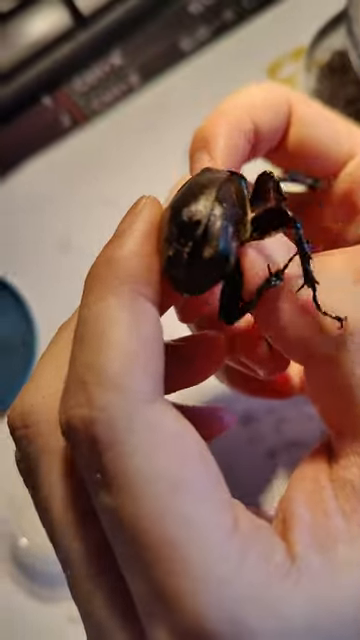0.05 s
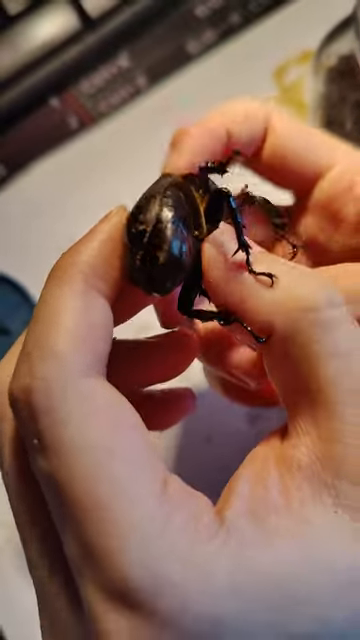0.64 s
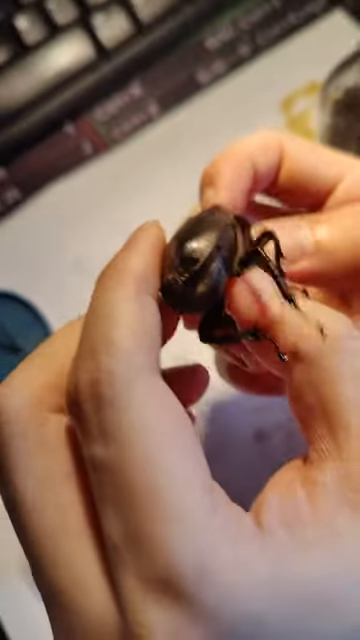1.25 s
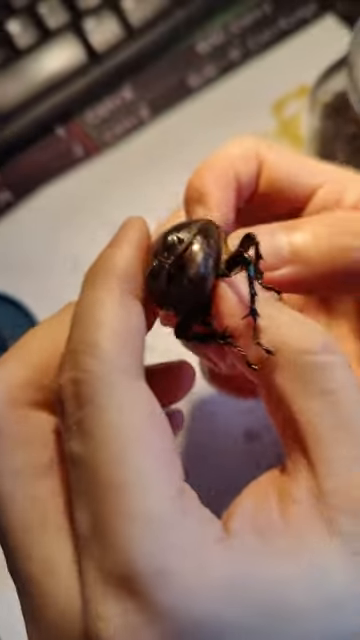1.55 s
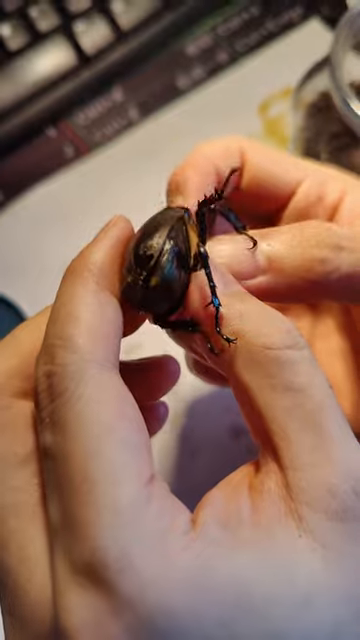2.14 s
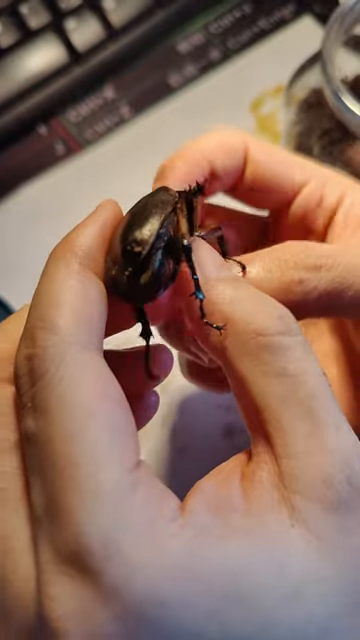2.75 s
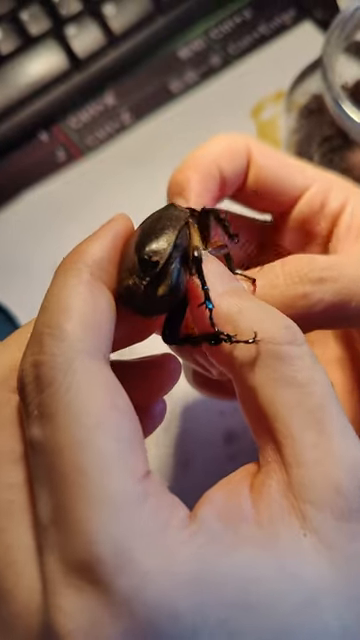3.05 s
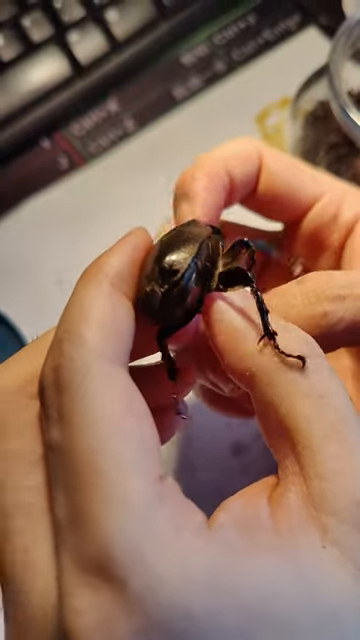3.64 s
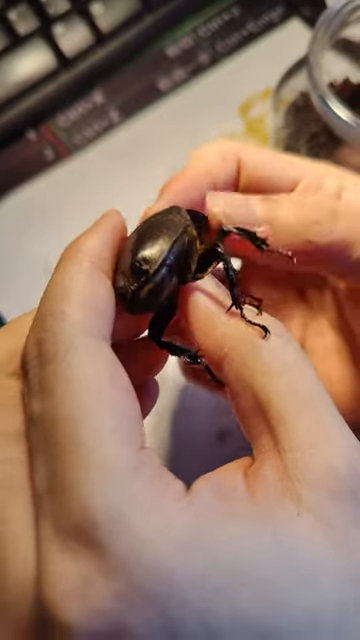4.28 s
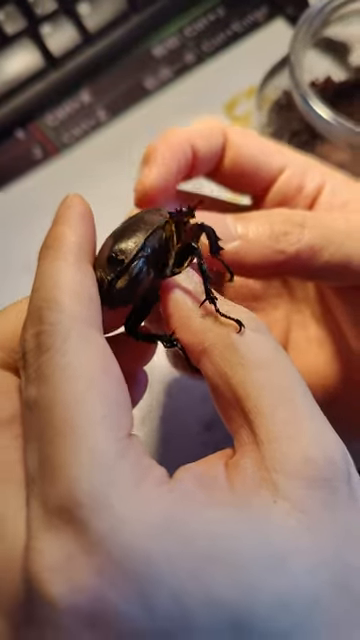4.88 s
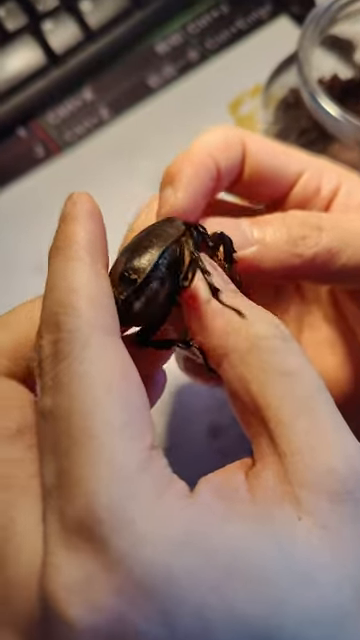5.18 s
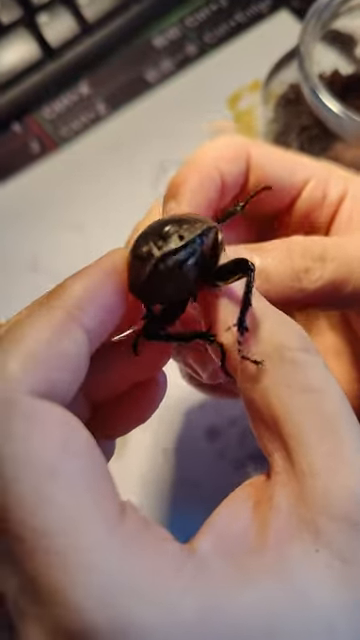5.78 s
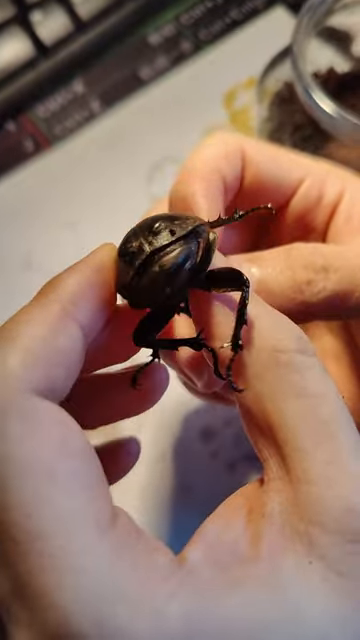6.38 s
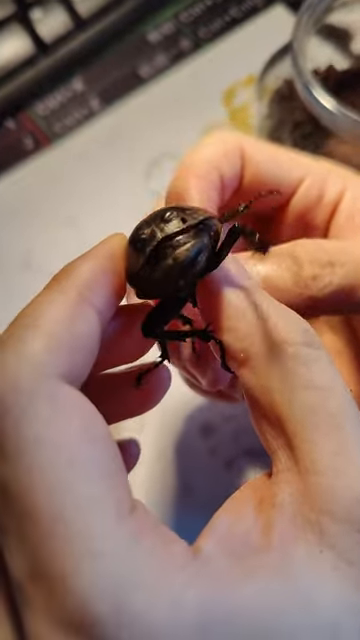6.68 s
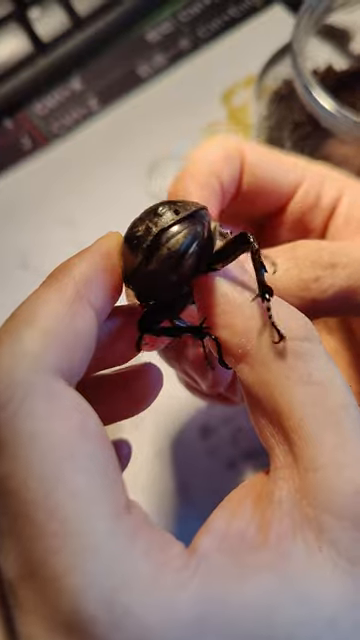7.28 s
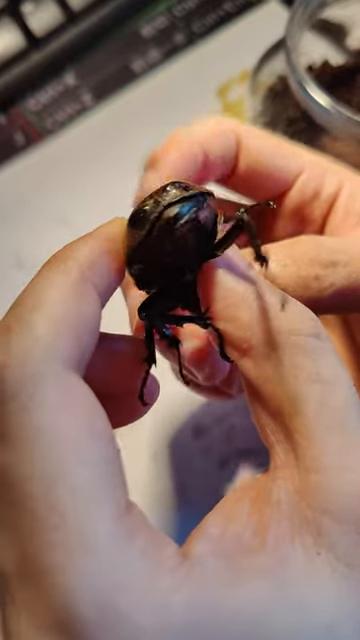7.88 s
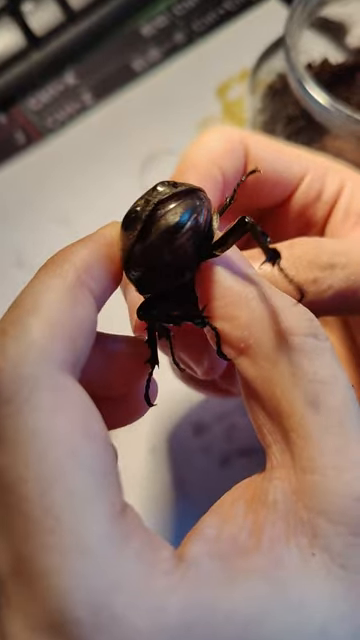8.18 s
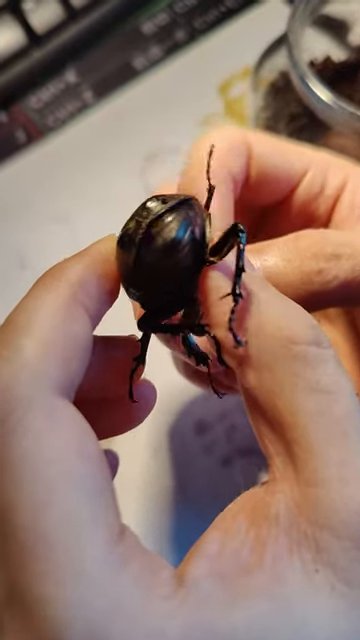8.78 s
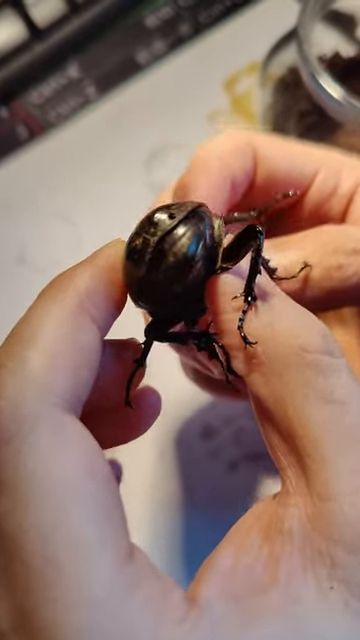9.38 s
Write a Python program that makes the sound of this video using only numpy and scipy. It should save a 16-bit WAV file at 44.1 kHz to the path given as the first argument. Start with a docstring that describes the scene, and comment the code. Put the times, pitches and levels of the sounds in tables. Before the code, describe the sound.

Computer fans give a steady low hum and rush of air in a small room. Close by, a beetle in someone's hand scrapes out brief, dry chirps, irregularly spaced and mostly quiet. A dull knock sounds after about a second, and light claw ticks and faint rubbing of fingers on shell fall between the chirps. The strongest chirps come in a quick run toward the end.

```python
"""A beetle chirping in the hand

A large beetle, held over a desk, drags a scraper over a file of tiny teeth. Every tooth clicks and rings
its shell, so each stroke makes a short, raspy chirp. Its legs rustle, its claws tick, skin rubs on the
shell and there are a few dull knocks. Computer fans hum steadily in the small room."""
import sys
import numpy as np
from scipy import signal
from scipy.fft import rfft, irfft, next_fast_len
from scipy.io import wavfile

SR = 44100
rng = np.random.default_rng(int(sys.argv[2]) if len(sys.argv) > 2 else 0)


def file_out(sig):
    """Save sig as 16-bit WAV at sys.argv[1]."""
    # one column per channel
    cols = np.atleast_2d(sig).T
    # limit, then scale
    lim = np.clip(cols, -1, 1)
    pcm = np.round(lim * 32767).astype(np.int16)
    wavfile.write(sys.argv[1], SR, pcm)


N = 420272
FFT_SIZE = next_fast_len(N + 2048, True)


def from_db(db):
    """Turn decibels into a gain."""
    return 10 ** (np.asarray(db) / 20)


def rms_one(x):
    """Scale a signal to an average strength (rms) of 1."""
    return x / np.sqrt(np.mean(x ** 2) + 1e-20)


def at_hz(points, hz):
    """Read between the rows of a (frequency, value) table, with octaves evenly spaced."""
    f, value = np.transpose(points)
    return np.interp(np.log(np.maximum(hz, 1)), np.log(f), value)


def bins():
    """The frequencies in the spectrum of a full-length signal."""
    return np.arange(FFT_SIZE // 2 + 1) * SR / FFT_SIZE


def filtered(x, response):
    """Give each frequency of bins() its own gain."""
    return irfft(rfft(x, FFT_SIZE) * response, FFT_SIZE)[..., :N]


def band(x, edges_hz, kind, order=2):
    """Keep one range of frequencies."""
    return signal.sosfilt(signal.butter(order, edges_hz, kind, fs=SR, output="sos"), x)


def below(x, hz, order=3):
    """Keep the part under hz; filtering both ways keeps its timing."""
    return band(band(x, hz, "low", order)[::-1], hz, "low", order)[::-1]


def drift(rate, size=N):
    """A random curve, about 1 in size, that changes about rate times a second."""
    hz = np.arange(2049) * SR / N
    slow = irfft(rfft(rng.standard_normal(4096)) / (1 + (hz / rate) ** 2))
    return np.interp(np.linspace(0, len(slow) - 1, size), np.arange(len(slow)), rms_one(slow))


def resonate(x, hz, width_hz):
    """Ring at one pitch; a wider resonance dies away sooner."""
    r = np.exp(-np.pi * width_hz / SR)
    feedback = [1, -2 * r * np.cos(2 * np.pi * hz / SR), r * r]
    return signal.lfilter(np.array([1, 0, -1]) * (1 - r * r) / 2, feedback, x + 1e-18)


def add(out, start_s, sound):
    """Mix a sound in at a given time."""
    i = int(start_s * SR)
    out[i:i + len(sound)] += sound[:N - i]


def pressure(t, length_s, attack_db_per_s, arch_db, release_db_per_s, swell_db=0):
    """The force of a rub: it builds until t = 0, arches for length_s, then lets go."""
    along = np.clip(t / length_s, 0, 1) - .5
    hold = swell_db * along - arch_db * (2 * along) ** 2
    attack = attack_db_per_s * np.maximum(-t, 0)
    release = release_db_per_s * np.maximum(t - length_s, 0)
    return from_db(hold - attack - release)


def echoes(x, first_s, t60_s, level_db):
    """Dense reflections, different left and right, that fade by 60 dB in t60_s."""
    t = np.arange(SR // 2) / SR
    noise = band(rng.standard_normal((2, len(t))), 3400, "low", order=1)
    tail = noise * (t > first_s) * from_db(-60 * t / t60_s)
    tail /= np.sqrt(np.sum(tail ** 2, axis=1, keepdims=True))
    return from_db(level_db) * signal.fftconvolve(x, tail, axes=1)[:, :N]


def hum(drone_hz=60, waver_hz=0.679, step=16):
    """Spinning fans and mains power make wavering tones; a low drone swells and fades."""
    # the drone's rise and fall: (time [s], level [dB])
    drone_levels = [(0.0, -51), (0.53, -70), (0.58, -56), (1.88, -73), (1.99, -48), (2.84, -63),
                    (3.95, -47), (4.35, -64), (4.62, -42.5), (5.1, -65), (5.28, -47), (5.76, -66),
                    (5.97, -51), (6.5, -61), (6.66, -50), (8.92, -57.5), (9.48, -49), (9.53, -57)]
    # fan and mains tones: (pitch [Hz], level [dB], flutter [dB])
    hum_tones = [(51.65, -61, 7.5), (96.9, -58.5, 1.5), (113.9, -60, 3.5), (147.7, -62, 3.5),
                 (200.5, -61.5, 0), (215.6, -60, 3.5), (243.5, -49.5, 1), (291.1, -53, 3.5),
                 (359, -65.5, 3), (400.7, -62, 1), (698, -66.5, 3.5)]
    t = np.arange(0, N, step) / SR   # low tones need few samples
    tones = from_db(np.interp(t, *np.transpose(drone_levels))) * np.sin(2 * np.pi * drone_hz * t)
    for hz, db, flutter_db in hum_tones:
        turns = hz * t + waver_hz * np.cumsum(drift(1.776, len(t))) * step / SR + rng.random()
        tones += from_db(db + flutter_db * drift(11.3, len(t))) * np.sin(2 * np.pi * turns)
    return signal.resample_poly(np.sqrt(2) * tones, step, 1, window="blackmanharris")[:N]


def fans(air_db=-48.5, hum_lean_db=1.0):
    """Fans push rushing air, alike on both sides only in the bass, and add their hum."""
    # the air's low rush and high hiss: (frequency [Hz], relative level [dB])
    rush = [(15, -24), (24, 6), (42, -3.5), (57, 2.5), (74, -5.5), (130, -4), (180, -4.5), (285, 0),
            (380, -7.5), (460, -15), (570, -18), (700, -8), (1000, -11.5), (1300, -17)]
    hiss = [(1700, -19), (2400, -23), (3200, -27.5), (5000, -32), (7200, -31), (9000, -52.5),
            (12000, -43.5), (15500, -58)]
    # how alike the air is on both sides: (frequency [Hz], likeness [-1 to 1])
    likeness = [(60, 1), (380, 0.88), (550, 0.088), (700, 0.61), (870, -0.046), (1300, -0.43), (2200, 0.11),
                (4000, -0.069)]
    # which way the air leans: (frequency [Hz], left minus right [dB])
    balance = [(150, 6.5), (400, 0), (830, 2.5), (1000, -4), (1700, -2.5), (2400, -1.5), (4000, 0.7),
               (12000, 1)]
    hz, sides = bins(), np.array([[1], [-1]])
    mid, side = rng.standard_normal((2, N))
    alike = np.clip(at_hz(likeness, hz), -1, 1)
    colour = from_db(at_hz(rush + hiss, hz) + sides * at_hz(balance, hz) / 2)
    shared = filtered(mid, colour * np.sqrt(1 + alike))
    opposite = sides * filtered(side, colour * np.sqrt(1 - alike))
    return from_db(air_db) * rms_one(shared + opposite) + hum() * from_db(sides * hum_lean_db)


def legs(level_db=-80, swing_db=6, grain_db=8.0):
    """Struggling legs rustle over the fingers in faint, uneven bouts."""
    effort = from_db(swing_db * np.minimum(drift(20.0), 1.5) - grain_db * drift(120))
    return from_db(level_db) * rms_one(band(effort * rng.standard_normal(N), [1700, 5500], "band"))


def skin(grain_db=5):
    """Skin slides over the shell with a grainy hiss."""
    # finger slides: (start [s], length [s], level [dB])
    slides = [(0.578, 0.072, -57.5), (1.325, 0.24, -59.5), (2.667, 0.077, -62.5), (4.044, 0.33, -57.5),
              (7.113, 0.07, -69)]
    # tone colour of the rubbing: (frequency [Hz], relative level [dB])
    colour = [(800, -22), (1800, 6), (2800, 7.5), (4500, -1.5), (7500, 6), (9300, -13.5), (12000, -10.5),
              (15000, 0)]
    t = np.arange(N) / SR
    force = sum(from_db(db) * pressure(t - s, length_s, attack_db_per_s=600, arch_db=2,
                                       release_db_per_s=250) for s, length_s, db in slides)
    grains = rng.standard_normal(N) * from_db(grain_db * drift(130))
    return force * rms_one(filtered(grains, from_db(at_hz(colour, bins()))))


def knocks():
    """Soft blows ring a few resonances that die away quickly."""
    # dull knocks: (time [s], peak level [dB])
    hits = [(0.587, -46), (1.3247, -24), (8.318, -39), (8.887, -36.5)]
    # their resonances: (pitch [Hz], width [Hz], relative level [dB])
    modes = [(150, 92, 5.5), (320, 66, 5), (740, 130, 4.5), (1570, 280, -0.5), (2290, 150, -11),
             (2850, 130, -8.5)]
    out, blow = np.zeros(N), signal.unit_impulse(SR // 20)
    rings = sum((-1) ** k * from_db(db) * resonate(blow, hz, width)
                for k, (hz, width, db) in enumerate(modes))
    thud = band(rings, 3200, "low")
    for s, db in hits:
        add(out, s, from_db(db) * thud / np.abs(thud).max())
    return out


def claws(slip_s=0.0018, snap_gain=0.012):
    """A claw catches, slips for an instant and rings one spot of the shell; the same kind of tick gives the
    loud knock its bright snap."""
    # claw ticks, and the bright snap that opens the loud knock near 1.32 s (rows at 1.324 and 1.3246): (time
    # [s], peak level [dB], pitch [Hz], resonance width [Hz])
    catches = [(0.584, -40, 3170, 3500), (0.5886, -42, 6500, 2780), (0.593, -53, 6200, 3500),
               (1.324, -42, 4130, 2200), (1.3246, -38, 6400, 1990), (1.3318, -39.5, 6700, 900),
               (3.169, -49.5, 3950, 1500), (3.8144, -52, 4190, 1500), (5.5733, -52.5, 5060, 2500),
               (5.9536, -56, 4150, 1500), (6.27, -40, 2900, 900), (6.294, -44.5, 2930, 1600),
               (6.3412, -40.5, 2720, 2370), (6.4904, -47, 3440, 1200), (7.772, -40, 3720, 2500),
               (7.786, -36.5, 3300, 2500), (8.107, -52, 6500, 5000), (7.802, -37, 3930, 2500),
               (8.318, -47.5, 6170, 4000), (8.887, -41, 1990, 2200), (9.221, -59, 5970, 4000)]
    out, t = np.zeros(N), np.arange(SR // 40) / SR
    for s, db, hz, width_hz in catches:
        slip = rng.standard_normal(len(t)) * t * np.exp(-t / slip_s)
        ring = resonate(resonate(slip, hz, width_hz), hz, width_hz)
        snap = snap_gain * (hz / 3000) ** 3 * band(slip, [1200, 5000], "band")   # finer tips snap more
        tick = ring + snap
        add(out, s, from_db(db) * tick / np.abs(tick).max())
    return out


def tooth_clicks(speed, top_teeth_per_s=880, jitter=.27, uneven_db=3.0, friction=.07):
    """The scraper clicks off unevenly spaced teeth and rubs faintly between them."""
    gaps, sizes = rng.standard_normal((2, 1024))
    rub = rng.standard_normal(SR // 2)[:len(speed)]
    travel = np.cumsum(top_teeth_per_s * speed) / SR
    tooth_places = np.cumsum(np.exp(jitter * np.clip(gaps, -2, 2)))
    at = np.searchsorted(travel, tooth_places)
    hit = at < len(speed)
    clicks = np.zeros(len(speed))
    clicks[at[hit]] = from_db(uneven_db * np.minimum(sizes[hit], 1))
    return rms_one(clicks / np.sqrt(speed)) + friction * rub


def shell(clicks, lightness_db, grip, detune_spread=0.0047):
    """Clicks ring the shell; light strokes sound woodier, ring less and vary more."""
    # shell resonances: (pitch [Hz], width [Hz], relative level [dB])
    modes = [(1430, 330, -6), (1716, 170, -7), (2199, 130, -7), (2441, 170, 9), (2746, 250, 1.5),
             (3021, 200, 0), (3480, 380, -4), (3674, 230, 3), (4223, 140, 1), (4990, 480, -3),
             (5660, 480, -4.5), (6358, 300, -6), (6847, 220, -8), (7271, 700, -4), (7700, 450, -11),
             (14000, 4000, -8)]
    # the fingers press on the shell differently each time
    loads = rng.standard_normal((len(modes), 2)) * (-1.5 + 0.5 * lightness_db)
    damping = 1 + 0.085 * lightness_db + 0.35 * max(grip, 0)
    out = 0
    for (hz, width, db), (detune, load_db) in zip(modes, loads):
        bending = grip * (2300 < hz < 2900)   # gripping makes these resonances higher and louder
        woody_db = 0.99 * lightness_db * (hz < 1900)
        gain = from_db(db + load_db + woody_db + 7.5 * bending)
        pitch = hz * (1 + 0.069 * bending) * np.exp(detune_spread * detune)
        out = out + gain * resonate(clicks, pitch, width * damping)
    return out


def stroke(t, length_s, level_db, swell_db, release_db_per_s, treble_db, grip,
           hard_db=-40, judder_db=1.8):
    """One scrape: the scraper bites quickly, runs faster as it presses harder, and judders."""
    force = pressure(t, length_s, attack_db_per_s=849, arch_db=1.58,
                     release_db_per_s=release_db_per_s, swell_db=swell_db)
    speed = np.maximum(force / force.max(), from_db(-20)) ** .28
    clicks = tooth_clicks(speed)
    loudness = force * from_db(level_db + judder_db * drift(55)[:len(t)])
    ring = shell(clicks, lightness_db=max(hard_db - level_db, 0), grip=grip)
    rounded = below(ring, 8400, order=5)   # blunt teeth give little of the highest treble
    chirp = rms_one(rounded + from_db(-14) * (ring - rounded))
    body = below(chirp, 4300)
    return loudness * (body + from_db(treble_db) * (chirp - body))


def chirps():
    """The beetle drags its scraper over the file in short, irregular strokes."""
    # strokes: (start [s], length [s], level [dB], swell from start to end [dB], release [dB/s],
    # treble lift [dB], finger grip [0 usual, 1 tight])
    strokes = [ (0.118, 0.071, -46, 2.5, 645, -4.5, 0.23), (0.24, 0.0079, -45.5, -1, 610, -4.5, 0),
               (0.285, 0.021, -49, 1, 580, -7, 0), (0.333, 0.077, -44, -2, 400, -5, 0),
               (0.885, 0.096, -51.5, 0.5, 248, -0.5, 0.19), (1.694, 0.089, -38, 3.5, 700, 5, 1.3),
               (1.83, 0.0096, -44.5, -1, 620, -3.5, 0.16), (1.959, 0.058, -58.5, 2.5, 505, 1.5, 0.71),
               (2.215, 0.062, -49, 3, 540, -5.5, 0.52), (2.402, 0.043, -50.5, 0.5, 249, -6, 0.22),
               (2.928, 0.012, -50.5, -1, 700, 1.5, 0.35), (3.56, 0.064, -51, 0, 296, -4, 0.39),
               (3.805, 0.0083, -47, 2.5, 805, 1, 0.25), (4.11, 0.038, -50.5, -0.5, 243, 2, 1.3),
               (4.321, 0.12, -49, 1.5, 300, -5, 0.041), (4.972, 0.074, -42, -4.5, 478, 0, 0.35),
               (5.661, 0.066, -38.5, 6.5, 600, -2.5, 0), (5.95, 0.0058, -48.5, -0.5, 885, -2, 0),
               (6.2, 0.0093, -51.5, 0.5, 800, 0, 0.24), (6.347, 0.051, -46, 3.5, 1230, -6.5, 0),
               (6.486, 0.0072, -46, 0.5, 570, -3, 0), (6.867, 0.078, -37, -1, 528, -0.5, 0.15),
               (7.185, 0.012, -58.5, 2, 600, -3, 0.3), (7.796, 0.056, -38.5, 4.5, 445, -2, 0),
               (8.08, 0.027, -55.5, 2, 597, -0.5, 0.23), (8.402, 0.039, -32, 2, 758, 5.5, 0),
               (8.485, 0.036, -40.5, 3, 494, -4, 0.12), (8.539, 0.053, -36, -2.5, 586, -4.5, 0),
               (8.89, 0.0069, -50.5, -4.5, 1010, -2, 0.19), (9.036, 0.022, -40.5, 3, 890, -2.5, 0.036),
               (9.081, 0.041, -37, 0, 1195, 1, 0), ]
    out, t = np.zeros(N), np.arange(-.06, .22, 1 / SR)
    for s, *shape in strokes:
        add(out, s + t[0], stroke(t, *shape))
    return out


def right_side(x, delay_s=0.00023):
    """The sound reaches the right later and mostly duller, with echo-like peaks and dips."""
    # the right side compared with the left: (frequency [Hz], gain [dB], extra phase lag [rad])
    right_response = [(700, -3, -.7), (1000, 1, .7), (1500, -6, 1.1), (1750, -3, 4.8), (1900, 3.5, 5.7),
                      (2100, -4.5, 6.8), (2420, -10, 9.6), (2600, -1, 11.5), (3170, -1.5, 11.5),
                      (3300, 4, 12.8), (3450, 1, 13.2), (3560, -7, 12.3), (3950, -2, 11.6), (4060, 4, 12.3),
                      (4220, -3, 13.4), (4600, 0, 12.5), (4800, -4, 13.3), (5100, -2, 13.1),
                      (5600, -6, 13.3), (6500, -8, 13.5), (6900, -2, 13.1), (7900, -15, 13.7),
                      (9500, -14, 14), (12000, -8, 14), (14600, -3, 12)]
    hz, rows = bins(), np.array(right_response)
    gain = from_db(at_hz(rows[:, [0, 1]], hz))
    lag = 2 * np.pi * hz * delay_s + at_hz(rows[:, [0, 2]], hz)
    return filtered(x, gain * np.exp(-1j * lag))


def scene():
    """The beetle is close on the left; desk and room throw its sound back while the fans run."""
    beetle = chirps() + skin() + legs()
    direct = np.array([beetle, right_side(beetle)]) + knocks() + claws()   # taps reach both sides alike
    desk = echoes(direct, first_s=.001, t60_s=.035, level_db=[[-24], [-20]])
    room = echoes(direct, first_s=0.0048, t60_s=0.18, level_db=-12.5)
    return direct + desk + room + fans()


def record(dry):
    """Cut the very highest treble steeply."""
    cutoff_hz = 15400
    return signal.sosfilt(signal.ellip(10, .1, 80, cutoff_hz, fs=SR, output="sos"), dry)


dry = scene()
out = record(dry)
file_out(out)
```